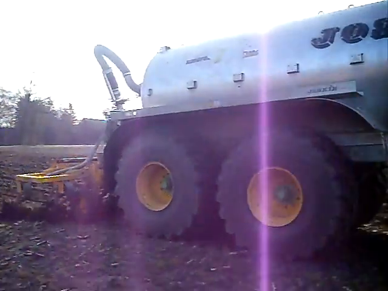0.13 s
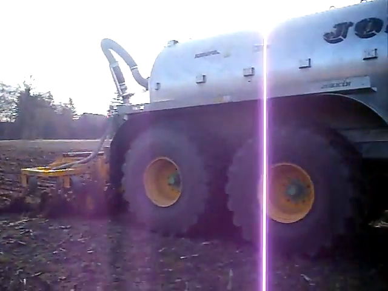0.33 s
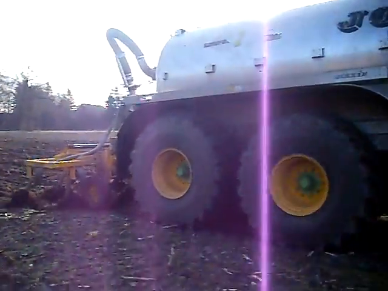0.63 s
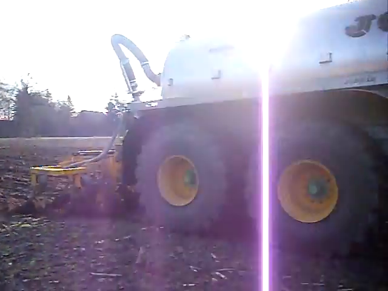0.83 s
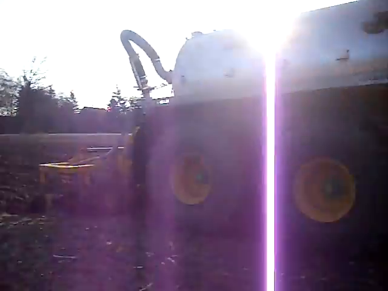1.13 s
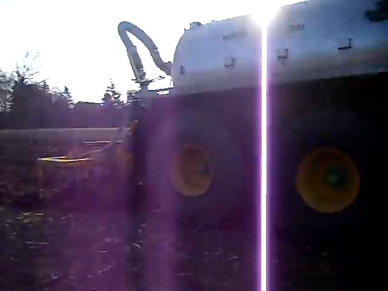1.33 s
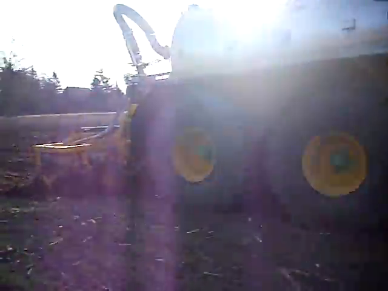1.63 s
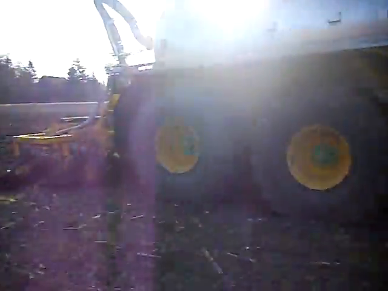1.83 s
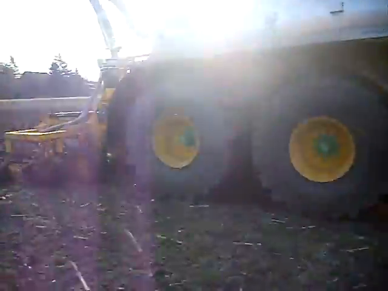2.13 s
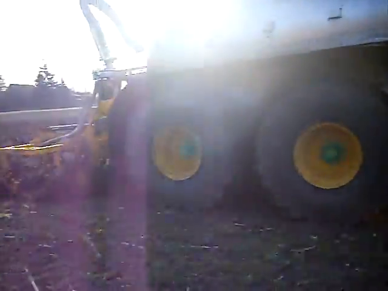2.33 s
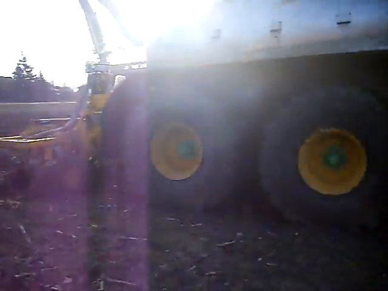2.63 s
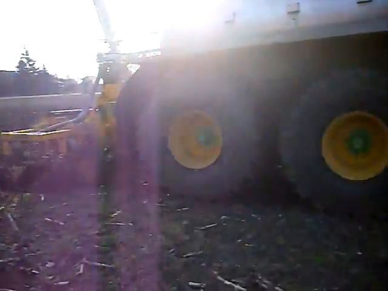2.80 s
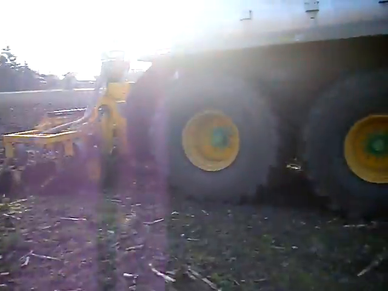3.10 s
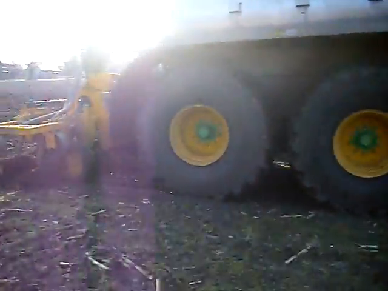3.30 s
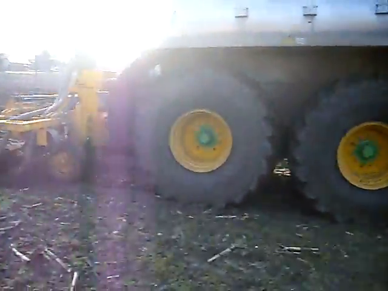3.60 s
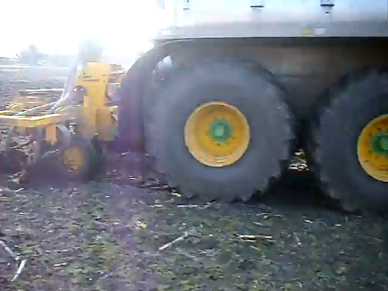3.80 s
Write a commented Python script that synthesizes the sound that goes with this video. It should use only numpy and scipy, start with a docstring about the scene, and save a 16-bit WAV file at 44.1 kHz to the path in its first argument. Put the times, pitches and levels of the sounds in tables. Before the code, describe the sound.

A tractor's diesel engine drones steadily while pulling a slurry tanker across an open field. A pump hums and gears whine throughout, over a deep throb, tyre rumble and the hiss of crumbling soil. The small microphone sounds slightly overloaded.

```python
"""A stubble field, over which a tractor slowly pulls a slurry tanker with a disc injector.
Tyres and discs rush through the soil as broadband noise; a hydraulic rotor throbs at its own pace.
The six-cylinder diesel drones and hunts a little. Pump and whining gears turn with it, so their
partials keep fixed ratios to the crank rate. A small, narrow-band microphone is driven just into clipping."""
import sys
import numpy as np
from scipy.fft import rfft, irfft, next_fast_len
from scipy.io import wavfile
from scipy.ndimage import map_coordinates

SR = 44100
rng = np.random.default_rng(int(sys.argv[2]) if len(sys.argv) > 2 else 0)


def store_pcm(level_fs):
    """Save levels as 16-bit WAV."""
    pcm = np.round(np.clip(level_fs, -1, 1) * 32767).astype(np.int16)
    wavfile.write(sys.argv[1], SR, np.atleast_2d(pcm).T)


N = 174195
T = np.arange(N) / SR


def amp(db):
    """Amplitude grows tenfold for every 20 dB."""
    return 10 ** (np.asarray(db) / 20)


def curve(rows, column=1):
    """Linear interpolation of a table column over time, one value per sample."""
    rows = np.asarray(rows)
    return np.interp(T, rows[:, 0], rows[:, column])


def wobble(rate):
    """Smooth random modulation: a spline through `rate` Gaussian values a second."""
    return map_coordinates(rng.standard_normal(4096), [T * rate], mode="wrap")


def filtered(x, response):
    """Linear filtering: the spectrum is multiplied by a frequency response."""
    size = next_fast_len(N + SR // 2)
    return irfft(rfft(x, size) * response(np.fft.rfftfreq(size, 1 / SR)), size)[:N]


def coloured(x, spectrum):
    """Spectral shaping by (Hz, dB) points, normalised to rms 1."""
    points_hz, db = np.transpose(spectrum)
    x = filtered(x, lambda hz: amp(np.interp(np.log(hz + 1), np.log(points_hz), db)))
    return x / np.sqrt(np.mean(x ** 2) + 1e-20)


def shelved(x, edge_hz, db):
    """A high shelf raises or lowers the band above the edge."""
    treble = filtered(x, lambda hz: 1 - 1 / (1 + (hz / edge_hz) ** 8))
    return x + (amp(db) - 1) * treble


def tone(cycles, db, flutter, rate=10):
    """A partial at an rms level; random quadrature modulation (flutter) broadens its spectral line."""
    angle = 2 * np.pi * (cycles + rng.random())
    wave = (1 + flutter * wobble(rate)) * np.sin(angle) + flutter * wobble(rate) * np.cos(angle)
    return np.sqrt(2 / (1 + 2 * flutter ** 2)) * amp(db) * wave


def partials(turns, orders, levels_db, flutter, rate):
    """Rotation excites tones at multiples (orders) of the shaft rate."""
    return sum(tone(k * turns, db, flutter, rate) for k, db in zip(orders, levels_db))


def rolling(crank):
    """Broadband noise: tyres rumble; machine roar and crumbling soil are modulated at the firing rate."""
    # Each row: frequency in Hz, relative spectral density in dB.
    tyre_spectrum, roar_spectrum, soil_spectrum = [(15, -2), (28, -0.5), (50, -14.5), (80, -13.5),
                                                   (140, -10.5), (220, -18.5), (350, -13), (450, -30),
                                                   (800, -46.5)], [(200, -24), (420, -6.5), (540, 1.5),
                                                                   (690, -4.5), (900, -4.5), (1120, -3),
                                                                   (1250, -13.5), (1500, -29), (2200, -55)], [(900, -13), (1300, -7.5),
                                                                                 (1500, -5.5), (1850, 3.5),
                                                                                 (2300, 2.5), (2550, 2),
                                                                                 (3000, -0.5), (3750, -3),
                                                                                 (4100, -16), (5000, -31.5)]
    # Each row: time in seconds, level in dB ahead of the shelf.
    roar_level, soil_level = [(0, -23.5), (.7, -22.5), (1.4, -23), (2.1, -22), (2.7, -24), (3.3, -24),
                              (3.95, -26.5)], [(0, -29), (.7, -29.5), (1.45, -29), (2.1, -30),
                                                  (2.6, -31.5), (3.3, -32), (3.95, -34)]
    # Each row: time in seconds, gain of the high shelf in dB.
    roar_shelf, soil_shelf = [(0, -1.2), (1.3, -0.92), (2.3, 0.12), (3.1, 1.3), (3.95, .5)], [(0, -.5), (1.5, -0.62), (2.5, 0.86), (3.95, 1.8)]
    firings = np.cos(2 * np.pi * 3 * crank)
    rumble = coloured(rng.standard_normal(N), tyre_spectrum) * amp(-19.5 + .8 * wobble(5.6))
    roar = shelved(coloured(rng.standard_normal(N), roar_spectrum), edge_hz=780, db=curve(roar_shelf))
    roar *= amp(curve(roar_level) + .44 * wobble(9) + .7 * firings)
    crumbs = rng.standard_normal(N) * amp(wobble(900))
    hiss = shelved(coloured(crumbs, soil_spectrum), edge_hz=2600, db=curve(soil_shelf))
    hiss *= amp(curve(soil_level) + .4 * wobble(12) + .29 * firings)
    return rumble + roar + hiss


def rotor():
    """Pitch follows rotation: the deep throb sinks as the rotor slows under load, then partly recovers."""
    # Each row: time in seconds, throb rate in Hz, level in dB.
    throb = [(0, 39.75, -20), (.3, 42.1, -21.5), (.7, 39.08, -32.5), (1.1, 37.94, -20), (1.45, 37.57, -17),
             (1.75, 31.13, -23), (1.9, 29.07, -18.5), (2.12, 29.04, -22.5), (2.3, 28.03, -24),
             (2.8, 25.53, -12), (2.98, 28.43, -21.5), (3.25, 31.87, -14), (3.95, 32.56, -15.5)]
    cycles = np.cumsum(curve(throb)) / SR
    db = curve(throb, column=2)
    return tone(cycles, db, flutter=.097, rate=12) + tone(2 * cycles, db - 24, flutter=.3, rate=5)


def gears(crank):
    """Periodic tooth contact gives a mesh tone and harmonics; shaft play smears the highest most."""
    # Each row: time in seconds, level in dB, for the mesh tone and its lower sideband.
    mesh_level, sideband_level = [(0, -25.5), (0.22, -19), (0.4, -28.5), (1.2, -31), (1.7, -26.0),
                                  (2.45, -28.5), (2.65, -29), (3.1, -32), (3.5, -24), (3.95, -30.5)], [(0, -19), (0.25, -23), (0.45, -25), (0.8, -25.5),
                                                (1.1, -23), (1.8, -37.5), (2.3, -37), (2.7, -35.5),
                                                (3.2, -41), (3.6, -23.5), (3.95, -26)]
    # The same columns for its second and fourth harmonics.
    whine_level, whistle_level = [(0, -30), (0.22, -34.5), (0.55, -27.5), (0.85, -23.5), (1.15, -36),
                                  (1.6, -25.5), (1.8, -30.5), (2.25, -24), (2.7, -26.5), (2.85, -39),
                                  (3.1, -26.0), (3.35, -31), (3.8, -26), (3.95, -24)], [(0, -32), (0.16, -27), (0.45, -39), (0.95, -31.5),
                                                 (1.7, -30.5), (2.1, -38), (3.3, -40.5), (3.95, -35)]
    # Each pair of entries: multiple of the gear shaft rate, level in dB.
    orders, levels_db = [7, 9, 9.79, 10.59, 16, 18, 25.5, 27, 29.75], [-46, -34.5, -37.5, -37.5, -42, -48, -51, -52.5, -50.5]
    shaft = 2.1295 * crank
    teeth = 8.49 * shaft + .013 * wobble(9.3)
    mesh = tone(teeth, curve(mesh_level), flutter=.19, rate=22)
    sideband = tone(7.98 * shaft, curve(sideband_level), flutter=.18, rate=17)
    swell_db = 2.5 * np.sin(2 * np.pi * (8.9 * T + .15 * wobble(4)))  # about nine swells a second
    whine = tone(2 * teeth, curve(whine_level) + swell_db, flutter=.12, rate=46)
    whistle = tone(4 * teeth, curve(whistle_level), flutter=.76, rate=85)
    return mesh + sideband + whine + whistle + partials(shaft, orders, levels_db, flutter=.42, rate=6.6)


def pump(crank):
    """Three lobes give a strong lobe-passing tone; the other shaft partials beat against the engine."""
    # Each row: time in seconds, level in dB.
    lobe_level, seventh_level = [(0, -13), (0.8, -15), (1.2, -16), (1.9, -17), (2.15, -16), (2.7, -17),
                                 (2.88, -19.5), (3.05, -17.5), (3.3, -19.5), (3.95, -17)], [(0, -39.5), (1.1, -37.5), (1.7, -44), (2.4, -41), (3, -32),
                                               (3.5, -42.5), (3.95, -35)]
    # Each pair of entries: multiple of the pump shaft rate, level in dB.
    orders, levels_db = [1, 2, 4, 5, 6, 8, 9], [-31.5, -32, -41.5, -39.5, -43, -43, -37]
    shaft = 3.2322 * crank
    weak = partials(shaft, orders, levels_db, flutter=.2, rate=4)
    lobes = tone(3 * shaft, curve(lobe_level), flutter=.11, rate=22)
    seventh = tone(6.97 * shaft, curve(seventh_level), flutter=.17, rate=8.7)
    return lobes + seventh + weak


def engine(crank):
    """Periodic firing, three times a turn, drones; unequal cylinders add weak partials and a fan hums."""
    # Each row: time in seconds, level in dB.
    firing_level = [(0, -14), (1.25, -12.5), (2, -14.5), (3.2, -15.0), (3.95, -16)]
    # Each pair of entries: multiple of the crank rate, level in dB.
    orders, levels_db = [3.5, 4, 4.5, 5, 6, 7.5, 8.5, 9, 13, 24], [-37.5, -47.5, -41, -43, -39.5, -38.5, -38.5, -35.5, -35.5,
                                                 -45]
    fan_cycles, fan_fade_db_per_s = 6.623 * crank, 1.26
    drone = tone(3 * crank, curve(firing_level), flutter=0)
    uneven = partials(crank, orders, levels_db, flutter=.28, rate=5)
    fan = tone(fan_cycles, -23 - fan_fade_db_per_s * T, flutter=.18, rate=9)
    fan_octave = tone(2 * fan_cycles, -40.5, flutter=.3, rate=3)
    return drone + uneven + fan + fan_octave


def scene():
    """Superposition of the sources; every tone but the rotor's follows the crankshaft."""
    # Each row: time in seconds, crankshaft speed in turns per second.
    speed = [(0, 31.73), (0.17, 32.1), (0.3, 31.66), (0.42, 31.24), (0.72, 31.55), (1.07, 30.87),
             (1.36, 31.54), (1.55, 31.27), (1.76, 31.42), (1.95, 30.9), (2.22, 31.42), (2.42, 30.95),
             (2.68, 31.52), (2.87, 31.15), (3.05, 31.36), (3.28, 30.95), (3.48, 31.46), (3.7, 31.14),
             (3.95, 31.33)]
    crank = np.cumsum(curve(speed)) / SR  # angle in turns
    return (engine(crank) + pump(crank) + gears(crank) + rotor() + rolling(crank))[None]


def record(dry, drive_db=.56, knee=7, ceiling=.79, band_hz=4250, clip_level=.71, top_hz=15800):
    """Saturation rounds the peaks, a steep low-pass narrows the band, and what overshoots is clipped."""
    x = dry[0] * amp(drive_db)
    x = x / (1 + np.abs(x / ceiling) ** knee) ** (1 / knee)
    x = filtered(x, lambda hz: 1 / np.sqrt(1 + (hz / band_hz) ** 70))
    x = np.clip(x, -clip_level, clip_level)
    return filtered(x, lambda hz: hz < top_hz)[None]


dry = scene()
out = record(dry)
store_pcm(out)
```